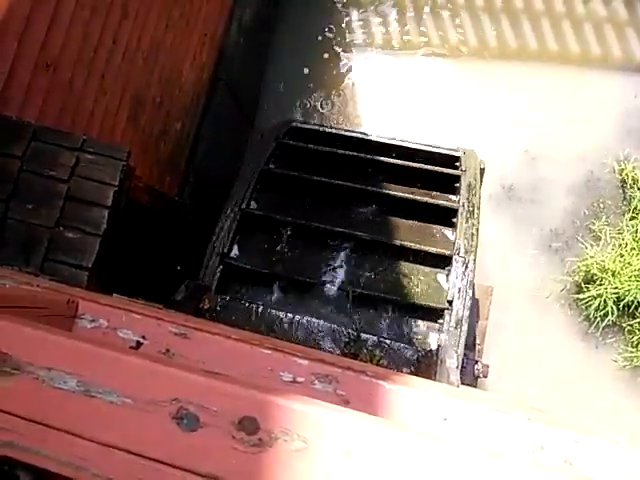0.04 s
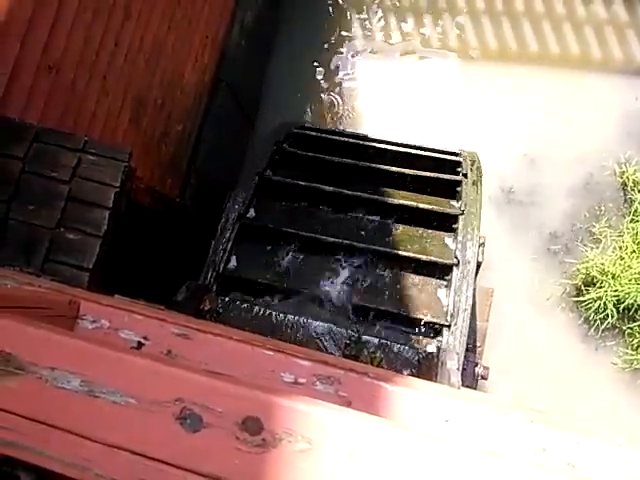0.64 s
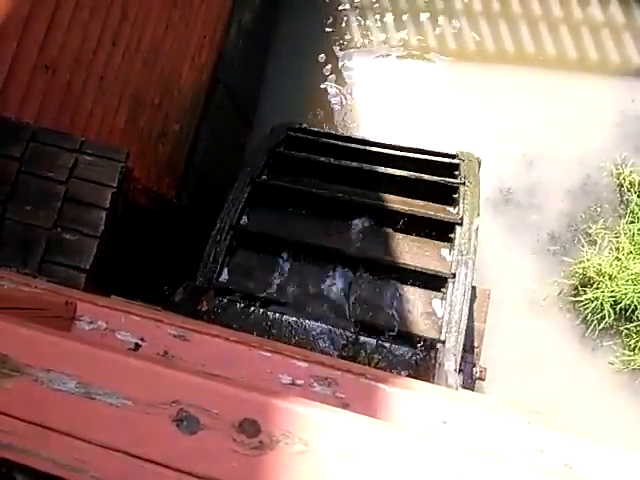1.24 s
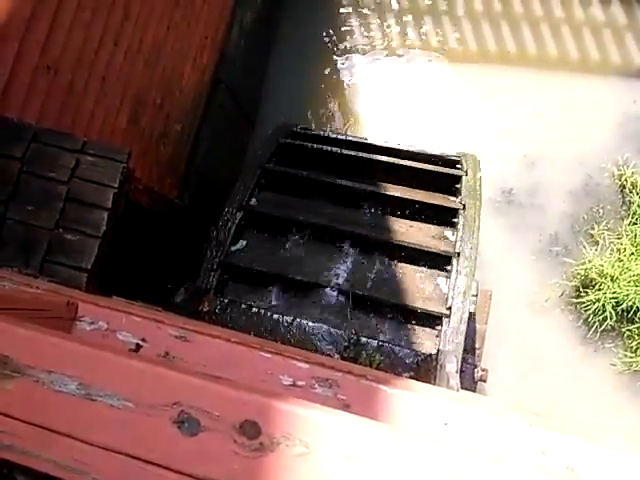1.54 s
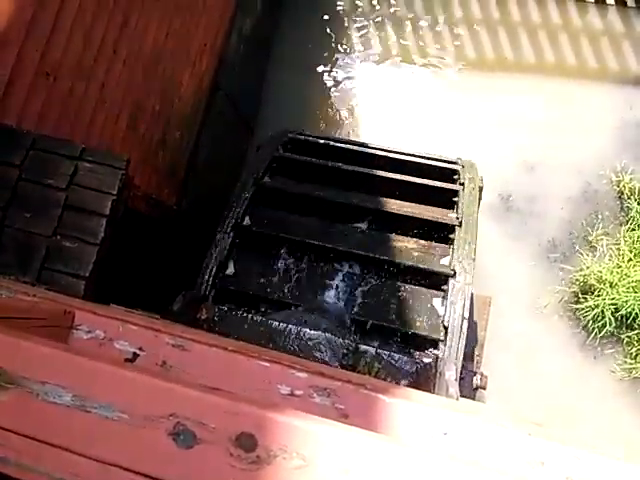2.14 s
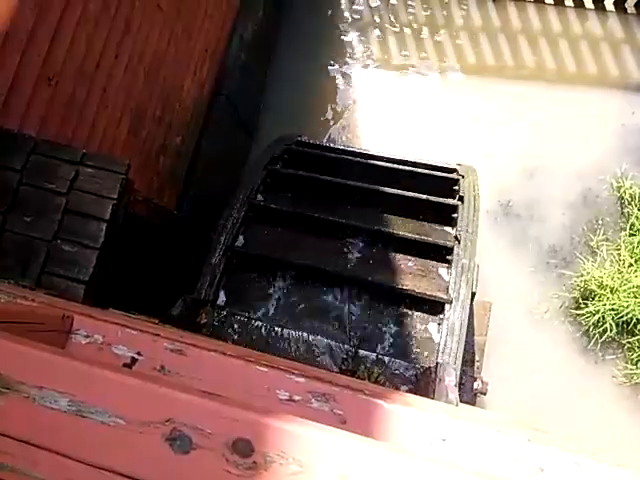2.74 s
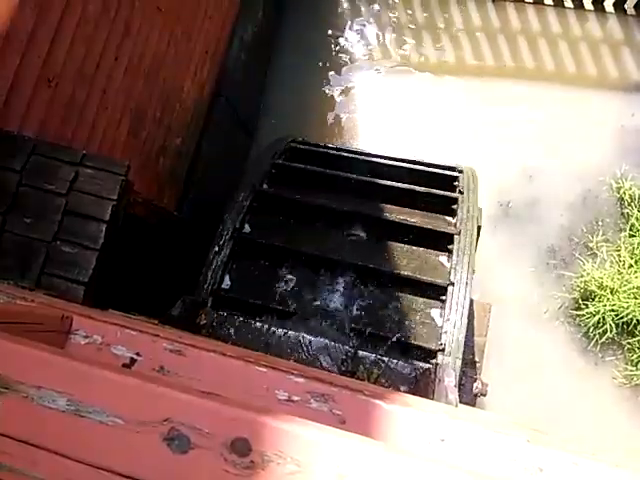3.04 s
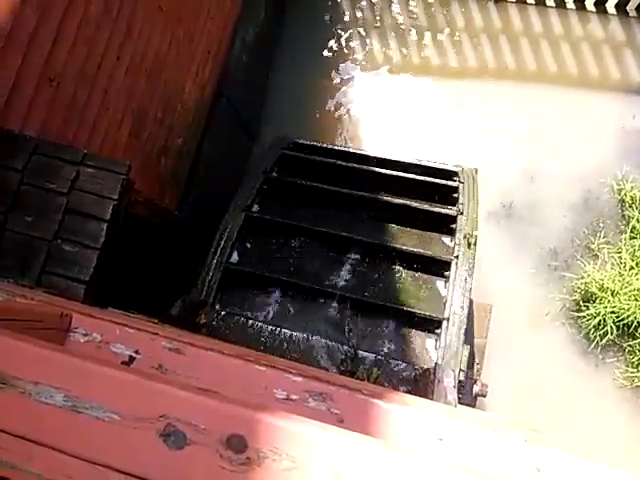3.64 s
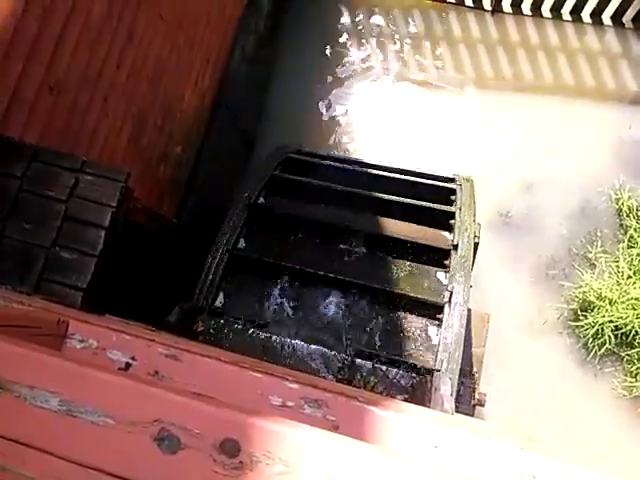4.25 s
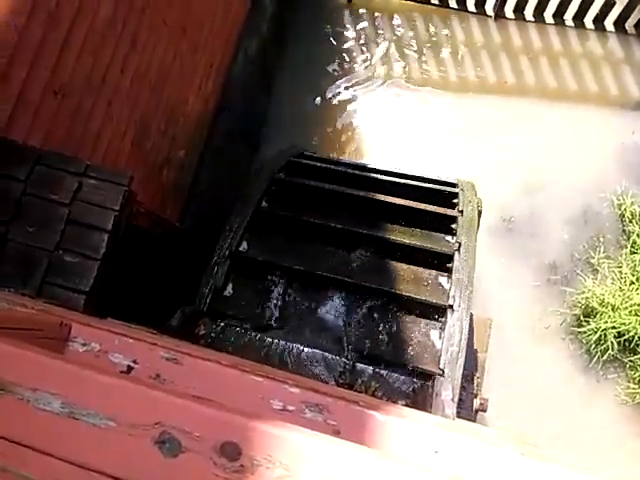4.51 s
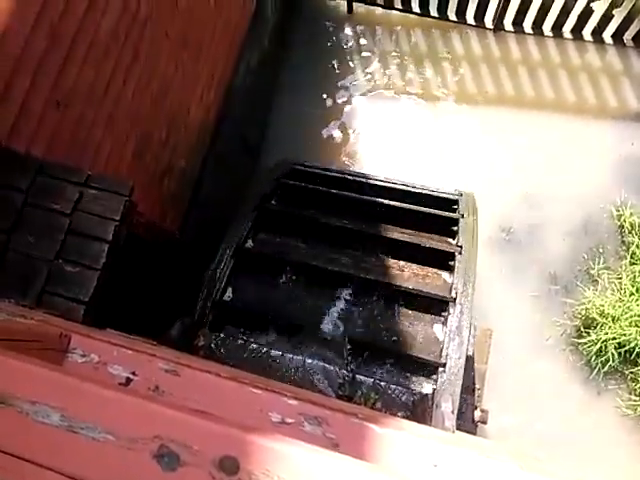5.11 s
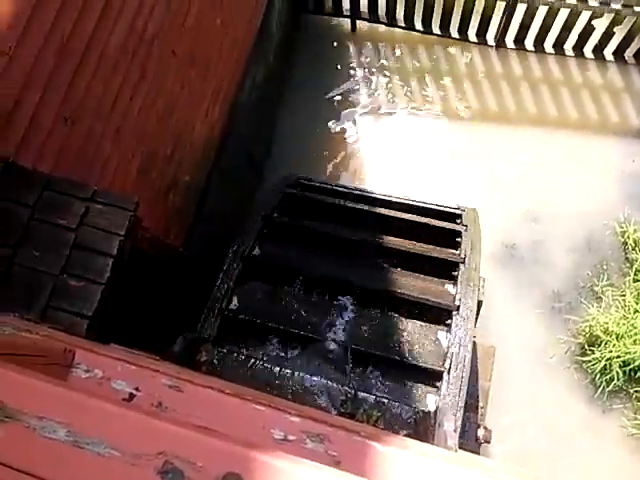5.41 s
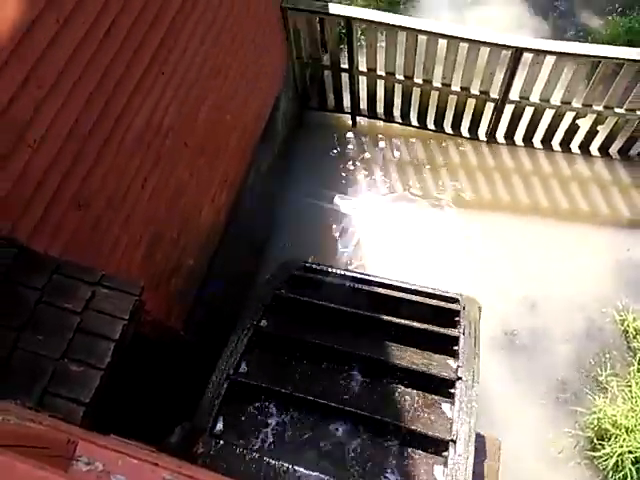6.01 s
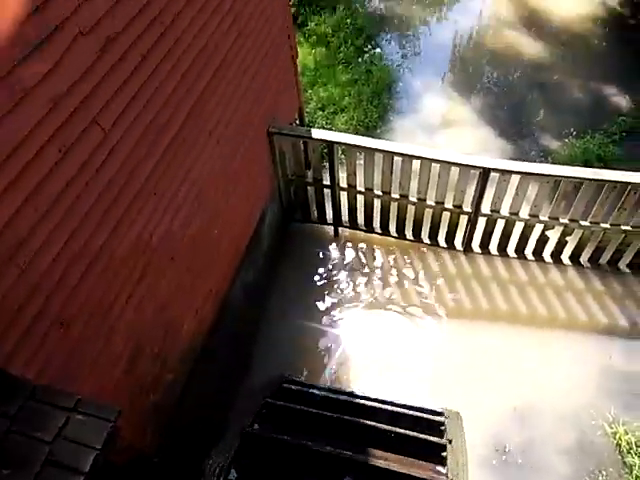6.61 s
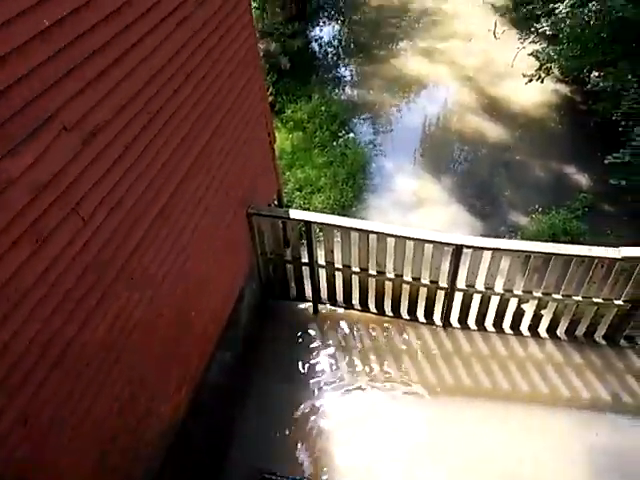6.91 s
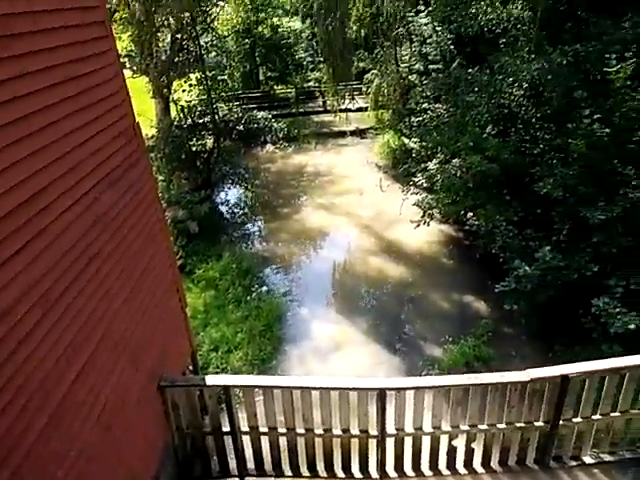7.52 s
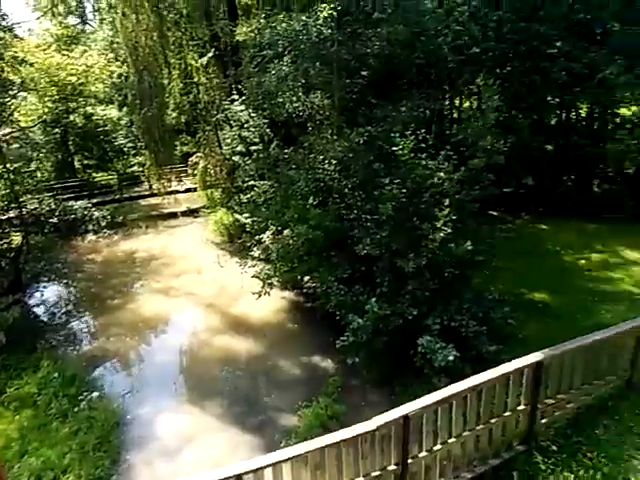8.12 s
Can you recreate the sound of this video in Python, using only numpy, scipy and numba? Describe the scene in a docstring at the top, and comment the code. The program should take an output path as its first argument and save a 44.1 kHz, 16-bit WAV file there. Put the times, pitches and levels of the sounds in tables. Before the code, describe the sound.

Water pours over a wooden mill wheel outdoors for about eight seconds, heard from above on a hand-held microphone. A steady, wide hiss of spray carries fine crackling drops and gurgling bubbles. The paddles tip out short, uneven splashes throughout, clustered around 1 to 1.7, 3 to 3.5 and 4.5 to 5.5 seconds. Single bubbles plop, most clearly near 2.4, 6.3 and 7.3 seconds. Low, dull handling thumps, some with faint finger scrapes, come in the first second, then around 2.2, 3.1, 4.4 and 7 to 7.6 seconds. From about 4 seconds, light gusts buffet the microphone in short low puffs, one side at a time, thickest around 4.3, 5.3 and in the last second. From 5.5 seconds the hiss shifts in tone as the microphone tilts toward the stream, and the water ends slightly fuller and louder.

```python
"""Mill wheel and stream.

Water spills over a wooden mill wheel below a hand-held camera, beside a wall and a stream.
Spray hisses, bubbles gurgle and the paddles slop; the hiss changes colour as the camera tilts up
to the stream. Low thumps and small finger scrapes come through the camera's case, and light gusts
buffet one microphone port at a time."""
import sys
import numpy as np
from scipy import signal
from scipy.fft import rfft, irfft
from scipy.io import wavfile
from scipy.ndimage import uniform_filter1d
from numba import njit

SR = 44100
rng = np.random.default_rng(int(sys.argv[2]) if len(sys.argv) > 2 else 0)


def store_wav(level_fs):
    """Save 16-bit WAV to argv[1]."""
    pcm = np.round(np.clip(np.atleast_2d(level_fs), -1, 1) * 32767)
    wavfile.write(sys.argv[1], SR, pcm.T.astype(np.int16))


N = 364266
TIME = np.arange(N) / SR
FREQ = np.maximum(np.fft.rfftfreq(N, 1 / SR), 1)

# Water colour per camera view, from down at the wheel to facing the stream: f/Hz, relative gain/dB
COLOUR_DOWN = [(30, 2), (100, -4), (380, -6), (650, -7.5), (1020, -7), (1330, -10), (1680, -4.5),
               (2050, -9.5), (2300, -6.5), (2780, -15), (3170, -8.5), (3600, -7.5), (4600, -9), (5350, -11),
               (6300, -5.5), (7100, -3), (8000, -6), (8900, -13), (9600, -10), (11000, -19.5), (14000, -17),
               (15700, -21.5)]
COLOUR_TILTING = [(40, 7), (100, -5.5), (400, -2), (1000, -8), (1700, -6), (2350, -5.5), (3000, -7.5),
                  (4000, -3), (5200, -3.5), (7200, 0.5), (8800, -2.5), (11000, -14), (14000, -12.5),
                  (15700, -12)]
COLOUR_LEVEL = [(40, -12), (100, 11), (400, -4), (1000, -6), (1600, -2), (2400, 0), (3500, -2.5),
                (4400, -6.5), (5500, 3.5), (7100, 6.5), (8700, 1.5), (11000, -8), (14000, -7.5),
                (15700, -13)]
COLOUR_STREAM = [(40, -20), (100, 12), (400, 2), (1000, -1.5), (1800, 6), (2800, 0), (3500, -1),
                 (4700, -10), (6800, 1), (8800, 0.5), (10500, -12.5), (14000, -9), (15700, -18)]
# Arrival at each view: t/s
VIEW_TIMES_S = [5.5, 6.3, 7.25, 7.95]
# Port balance: f/Hz, left minus right/dB
BALANCE_WHEEL = [(400, -1.2), (950, 0), (1250, -1), (1900, 2.5), (2400, -0.5), (3200, 1.3), (4200, 0.5),
                 (5000, 6.5), (5800, -2.5), (6800, -3), (8500, .3), (12500, 0.5), (14000, 3), (15500, 3)]
BALANCE_STREAM = [(400, 0.5), (1000, 1), (1400, 1.5), (1900, 1.5), (2400, -0.5), (3500, -4), (5500, -0.5),
                  (7000, -0.7), (10000, 0), (15000, -4)]
# Steady fall of water: t/s, spray level/dB, pool level/dB
WATER_FLOW = [(0.0, -42.5, -49.5), (0.85, -42.5, -52.5), (1.66, -40.5, -51), (2.42, -42, -53),
              (3.13, -41.5, -50), (3.47, -43, -51), (4.23, -41.5, -52), (5.89, -42, -52),
              (7.66, -42.5, -47), (8.26, -38.5, -47.5)]


def wheel(pool_db=-2.5, surge_db=-6.0, mist_db=-2.0, mist_follow=0.75, slosh_hz=9):
    """Falling water: low pool, mid splatter, high mist, its hiss changing colour as the camera tilts."""
    ports = at_ports(churn())
    ports = ports / (1 + (62 / FREQ) ** 3)  # small bubbles make no deep bass
    pool_band = 1 / (1 + (FREQ / 2900) ** 12)
    below_mist = 1 / (1 + (FREQ / 5600) ** 8)
    slosh = walk(slosh_hz)  # uneven flow over the paddles stirs both pool and spray
    pool_gain = undb(curve(WATER_FLOW, column=2) + pool_db + 0.8 * slosh)
    sheet_gain = undb(curve(WATER_FLOW, column=1) - 0.1 * slosh)
    splatter_gain = np.hypot(sheet_gain, undb(surge_db) * thrown_spray())
    softened_surges = splatter_gain ** mist_follow * splatter_gain.mean() ** (1 - mist_follow)
    mist_gain = undb(mist_db + 0.3 * walk(16)) * softened_surges
    views = [(COLOUR_DOWN, BALANCE_WHEEL), (COLOUR_TILTING, BALANCE_WHEEL),
             (COLOUR_LEVEL, BALANCE_STREAM), (COLOUR_STREAM, BALANCE_STREAM)]
    out = 0
    for (colour, balance), share in zip(views, np.eye(4)):
        spectrum = ports * undb(along(colour, FREQ)) * pan(along(balance, FREQ))
        deep = spectrum / band_rms(spectrum, 1500, 2700)
        bright = spectrum / band_rms(spectrum, 3000, 10000)
        pool = irfft(deep * pool_band, N) * pool_gain
        splatter = irfft(bright * (1 - pool_band) * below_mist, N) * splatter_gain
        mist = irfft(bright * (1 - below_mist), N) * mist_gain
        crossfade = np.interp(TIME, VIEW_TIMES_S, share)
        out = out + crossfade * (pool + splatter + mist)
    return out


# Likeness of the water at the two ports: f/Hz, coherence
PORT_COHERENCE = [(100, 0.91), (420, .8), (750, 0.74), (1000, 0.28), (1450, 0.14), (1700, 0.37),
                  (2000, 0.18), (2400, 0.48), (2900, 0.24), (3500, 0.37), (5500, 0.078), (8000, .02)]
# Phase between the ports: f/Hz, left lead/rad
PORT_LEAD = [(200, 0.16), (600, 0.75), (1050, 1.27), (1300, 2), (1700, 0.67), (2500, .02)]


def at_ports(water):
    """Spectra of the water at the two ports: alike in the bass, nearly unrelated in the treble."""
    common, difference = rfft(water)
    coherence = along(PORT_COHERENCE, FREQ)
    mid = common * np.sqrt(1 + coherence)
    side = difference * np.sqrt(1 - coherence)
    return np.array([(mid + side) * np.exp(1j * along(PORT_LEAD, FREQ)), mid - side])


def churn():
    """Uncoloured water: spray, crackling and ringing drops, spatter on wet boards, bubbles, gulps."""
    hiss = undb(2.5) * spray()
    crackle = undb(-5) * shower(2950, 13500, cycles=4.4, spread_db=-0.5, rise=0.026, count=22000)
    tinkles = undb(-11) * shower(3000, 8500, cycles=390, spread_db=-1, rise=0.0545, count=1500)
    patter = undb(-11) * shower(2943, 9180, cycles=49, spread_db=-0.5, rise=0.024, count=700)
    spatter = undb(-10) * shower(4400, 14000, cycles=1.7, spread_db=1.5, rise=0.02, count=1500)
    bubbles = undb(-10) * shower(990.4, 4225, cycles=48, spread_db=3, rise=0.048, count=2600)
    gulps = undb(-19) * shower(245, 700, cycles=13.6, spread_db=4, rise=0.097, count=420)
    return hiss + crackle + tinkles + patter + spatter + bubbles + gulps


def spray(flicker_db=3.0, flicker_hz=26):
    """Sheets of spray, a noise band each, swell and thin on their own; the finest are steadiest."""
    noise = rfft(rng.standard_normal((2, N)))
    centres_hz = [500, 1200, 1800, 2500, 3300, 4200, 5300, 6600, 8200, 13000]
    hiss = 0
    for hz, share in zip(centres_hz, np.eye(len(centres_hz))):
        sheet = irfft(noise * np.interp(FREQ, centres_hz, share), N)
        unrest = np.clip(4800 / hz, 0.55, 1)
        hiss = hiss + sheet * undb(unrest * flicker_db * walk(flicker_hz))
    return hiss


def shower(lo_hz, hi_hz, cycles, spread_db, rise, count):
    """Bubbles of uneven size spread evenly over a band; two unrelated channels, rms 1."""
    when, pitch, size, life, left_turns, right_turns = rng.random((count, 6)).T
    hz = lo_hz + (hi_hz - lo_hz) * pitch
    amplitude = undb(-spread_db * np.log(1 - 0.99 * size)) * np.sqrt(hz)
    left, right = np.exp(2j * np.pi * left_turns), np.exp(2j * np.pi * right_turns)
    return unit(ring(when * N / SR, hz, cycles * (0.5 + life), amplitude, left, right, rise))


@njit
def ring(start_s, hz, cycles, amplitude, left, right, rise):
    """Damped sines, rising as the bubbles near the surface; left and right are complex port gains."""
    out = np.zeros((2, N))
    for k in range(len(start_s)):
        decay_samples = cycles[k] * SR / hz[k] / 3
        omega = 2 * np.pi * hz[k] / SR
        phasor = amplitude[k] + 0j
        step = np.exp(1j * omega - 1 / decay_samples)
        glide = np.exp(1j * omega * rise / (5 * decay_samples))
        for i in range(int(start_s[k] * SR), min(N, int(start_s[k] * SR + 5 * decay_samples))):
            out[0, i] += (phasor * left[k]).imag
            out[1, i] += (phasor * right[k]).imag
            phasor *= step
            step *= glide
    return out


# Paddles tipping out water: t/s, length/s, gush level/dB, gush f/Hz, spray level/dB
PADDLE_SPLASHES = [(0.625, 0.025, -59, 2000, -53), (0.861, 0.13, -51.5, 1880, -36),
                   (1.046, 0.047, -49, 1710, -35.5), (1.111, 0.073, -58, 3530, -40),
                   (1.287, 0.058, -67, 1900, -35.5), (1.332, 0.06, -48.5, 1870, -49),
                   (1.479, 0.06, -49, 3380, -44), (1.675, 0.14, -51.5, 1760, -40),
                   (2.344, 0.082, -47.5, 2020, -40), (2.817, 0.063, -58, 1810, -43),
                   (2.888, 0.035, -56, 3500, -34.5), (2.964, 0.051, -53, 3500, -37.5),
                   (3.198, 0.037, -50, 2100, -44), (3.25, 0.15, -54, 3450, -42),
                   (3.417, 0.015, -45, 1680, -50), (3.455, 0.026, -49, 2000, -56),
                   (3.866, 0.28, -57, 1740, -39.5), (4.36, 0.048, -67, 1800, -35.5),
                   (4.558, 0.057, -48, 3300, -41), (4.798, 0.053, -51, 1800, -37),
                   (4.875, 0.027, -55, 1800, -37.5), (5.066, 0.08, -55, 3530, -38),
                   (5.129, 0.066, -52, 1850, -42), (5.359, 0.047, -67, 1800, -37),
                   (5.438, 0.02, -44, 1630, -46), (6.145, 0.07, -50.5, 2400, -43),
                   (6.384, 0.14, -49.5, 2300, -41.5), (6.869, 0.026, -53, 2200, -34),
                   (7.075, 0.028, -67, 2100, -32.5), (7.317, 0.042, -45.5, 2200, -38),
                   (7.645, 0.012, -34, 2100, -51), (7.67, 0.024, -41, 1900, -55),
                   (7.737, 0.016, -46, 1900, -55), (7.796, 0.035, -42.5, 2850, -47),
                   (7.989, 0.06, -45, 3140, -37.5), (8.058, 0.04, -38, 2670, -42)]


def splashes(q=2.26, width=0.6):
    """A paddle empties: a short rush of small bubbles around one pitch."""
    out = np.zeros((2, N))
    for start_s, length_s, db, hz, _ in PADDLE_SPLASHES:
        gush = lambda f: resonance(f, hz, q) ** 2
        mid, side = (burst(length_s, gush, attack_s=0.002, decay_s=0.01, tail_db=-27, tail_s=0.056)
                     for _ in range(2))
        add(out, undb(db) * stereo(mid, side, width), start_s)
    return out


def thrown_spray(rise_s=0.0077, fall_s=0.0075):
    """Gain of the spray the paddles throw: it rises, lasts as long as the gush and falls back."""
    power = 0
    for start_s, length_s, _, _, db in PADDLE_SPLASHES:
        rise = np.clip((TIME - start_s) / rise_s + 0.5, 0, 1)
        fall = np.exp(-np.maximum(TIME - start_s - length_s, 0) / fall_s)
        power = power + (undb(db) * rise * fall) ** 2
    return np.sqrt(power)


# Single large bubbles: t/s, level/dB, f/Hz
LARGE_BUBBLES = [(0.385, -40, 1770), (0.879, -38, 1720), (1.052, -35.5, 1030), (1.373, -33.5, 1860),
                 (1.945, -36, 1950), (2.3644, -25, 1610), (2.389, -23.5, 1680), (2.485, -40, 1640),
                 (2.514, -31.5, 1630), (2.568, -36, 1720), (3.238, -36, 1660), (4.965, -46, 380),
                 (5.095, -42, 245), (5.165, -36, 1700), (5.435, -41, 496), (5.99, -45, 368),
                 (6.11, -42, 440), (6.25, -45.5, 365), (6.3, -47, 483), (6.308, -28.5, 2360),
                 (6.53, -34, 2350), (6.66, -29, 2420), (7.224, -29, 1560), (7.335, -25, 1460),
                 (7.609, -33, 1280), (7.681, -39, 1920), (8.25, -28, 1760)]


def plops(gain_db=3.0, lead_rad=0.59, scatter_rad=1.2, shed_s=0.028, shed_db=-12, shed_octaves=0.18):
    """A large pocket of trapped air rings once and sheds five weaker bubbles near its pitch."""
    out = np.zeros((2, N))
    for start_s, db, hz in LARGE_BUBBLES:
        gain = undb(db + gain_db)
        add(out, gain * bubble(hz, lead_rad), start_s)
        for late, detune, place in rng.uniform(-1, 1, (5, 3)):
            shed = bubble(hz * 2 ** (shed_octaves * detune), lead_rad + scatter_rad * place)
            add(out, gain * undb(shed_db) * shed, start_s + shed_s * (1 + late) / 2)
    return out


def bubble(hz, lead_rad, rise=0.019, q=19.2, swell_cycles=4.6, size=4096):
    """One bubble swells, rings and fades as its pitch climbs; the left port leads by lead_rad."""
    cycles = hz * np.arange(size) / SR
    envelope = swell(cycles / swell_cycles) * np.exp(-np.pi * cycles / q)
    phase = 2 * np.pi * cycles * (1 + rise * cycles / (2 * q))
    return envelope * np.sin(phase + np.array([[lead_rad], [0]]))


# Bumps on the case: t/s, length/s, level/dB, nominal f/Hz
CASE_THUMPS = [(0, 0.071, -30.5, 74.5), (0.018, 0.048, -28.5, 147), (0.307, 0.038, -35, 140),
               (0.384, 0.34, -44, 132), (0.572, 0.045, -34.5, 149), (0.632, 0.06, -30.5, 157),
               (0.65, 0.063, -32, 75), (0.695, 0.045, -35, 122), (0.75, 0.074, -41, 90.5),
               (1.865, 0.083, -47.5, 180), (1.994, 0.062, -28.5, 117), (2.041, 0.039, -29.5, 129),
               (2.099, 0.08, -41, 122), (2.165, 0.077, -32.5, 89), (2.257, 0.032, -21.5, 130),
               (2.297, 0.0307, -34.5, 152), (3.106, 0.017, -38, 150), (3.125, 0.03, -30, 133),
               (3.163, 0.013, -27, 133), (3.2, 0.013, -37, 99), (3.56, 0.0188, -34, 104),
               (4.386, 0.012, -27, 149), (4.398, 0.022, -19, 122), (4.435, 0.026, -24, 110),
               (4.483, 0.041, -30.5, 79.6), (7.04, 0.036, -32.5, 153), (7.073, 0.029, -28, 149),
               (7.344, 0.029, -31.5, 155), (7.5, 0.02, -35, 138), (7.625, 0.0094, -31.5, 180),
               (7.642, 0.061, -29.5, 194)]


def thumps(width=0.13, settle_s=0.24, settle_db=-23, settle_ratio=0.85):
    """Bumps shake the whole case, nearly alike at both ports; the grip settles with a lower rumble."""
    def boom(hz):
        return lambda f: (low_pass(f, 1.07 * hz, q=3.1) * low_pass(f, 235, q=1.86)
                          * high_pass(f, 52, q=1.78))

    out = np.zeros((2, N))
    for start_s, length_s, db, hz in CASE_THUMPS:
        mid, side = (knocks(length_s, boom(hz), gap_s=0.008, fade_db=1.5) for _ in range(2))
        add(out, undb(db) * stereo(mid, side, width), start_s)
        settle = knocks(settle_s, boom(settle_ratio * hz), gap_s=0.0054, fade_db=35, first_db=-2)
        add(out, undb(db + settle_db) * np.array([settle, settle]), start_s + length_s)
    return out


# Modes of the hollow inside the case: f/Hz, Q, gain/dB
CAVITY_MODES = [(287, 10.5, -1.5), (368, 18.5, 6.5), (459, 17, -4.5), (596, 58, -8), (775, 19, -31)]
# Fingers on the case: t/s, length/s, shell level/dB, shell f/Hz, cavity level/dB
FINGER_SCRAPES = [(0.005, 0.077, -43.5, 1460, -43), (0.298, 0.087, -50.5, 1500, -53.5),
                  (0.579, 0.2, -53.5, 1540, -45.5), (1.988, 0.082, -45, 1480, -55),
                  (3.104, 0.023, -48, 1350, -45), (3.124, 0.009, -31, 1300, -39),
                  (3.135, 0.048, -39, 1330, -42.5), (3.524, 0.059, -46, 1360, -46),
                  (3.53, 0.0065, -39, 1340, -52), (4.373, 0.068, -47.5, 1470, -56),
                  (7.027, 0.04, -47.5, 1500, -38.5), (7.071, 0.043, -49, 1590, -38),
                  (7.333, 0.047, -61, 1500, -42), (7.473, 0.2, -76, 1500, -48.5)]


def scrapes(shell_q=8, upper_ratio=1.25, upper_db=-9, rasp_db=-14, pan_db=3.0, width=0.87):
    """Skin sticks and slips on the case, ringing two shell modes and, lower down, the cavity."""
    def cavity(f):
        modes = sum(undb(db) * resonance(f, hz, q) for hz, q, db in CAVITY_MODES)
        return modes * low_pass(f, 620, q=0.74)

    out = np.zeros((2, N))
    for start_s, length_s, shell_db, shell_hz, cavity_db in FINGER_SCRAPES:
        def shell(f):
            lower = resonance(f, shell_hz, shell_q)
            upper = undb(upper_db) * resonance(f, upper_ratio * shell_hz, shell_q)
            rasp = undb(rasp_db) * resonance(f, 1000, q=1.1)
            return (lower + upper + rasp) * low_pass(f, 2170, q=0.38)

        mid, side = (knocks(length_s, shell, gap_s=0.0028, fade_db=4, count=80) for _ in range(2))
        rub = stereo(mid, side, width)
        hollow = burst(length_s, cavity, attack_s=0.012, decay_s=0.0041, tail_db=-35, tail_s=0.069)
        add(out, pan(pan_db) * (undb(shell_db) * rub + undb(cavity_db) * hollow), start_s)
    return out


# Puffs of air: t/s, length/s, level/dB, eddy f/Hz, port (0 left, 1 right)
PORT_GUSTS = [(4.058, 0.046, -27, 68, 0), (4.287, 0.03, -34.5, 75, 1), (4.319, 0.025, -20.5, 87, 1),
              (4.369, 0.04, -28, 95, 1), (4.403, 0.083, -24, 89, 1), (4.538, 0.11, -44, 70, 0),
              (4.746, 0.017, -39.5, 100, 0), (5.176, 0.041, -37, 75, 0), (5.244, 0.037, -27.5, 81.4, 0),
              (5.301, 0.025, -21, 92, 0), (5.345, 0.024, -21, 68.4, 0), (5.395, 0.055, -28, 91, 0),
              (5.444, 0.06, -28, 89, 0), (5.521, 0.044, -27.5, 96, 0), (5.584, 0.026, -27.5, 81, 0),
              (5.632, 0.042, -36.5, 75, 0), (5.693, 0.0126, -22, 118, 0), (5.888, 0.054, -30, 66, 0),
              (6.547, 0.1, -28.5, 68.6, 1), (6.686, 0.025, -30.5, 70, 1), (6.906, 0.039, -34, 67, 0),
              (7.179, 0.051, -30.5, 62.4, 0), (7.4, 0.019, -24, 102, 0), (7.454, 0.028, -30, 103, 0),
              (7.714, 0.046, -27.5, 91, 1), (7.8, 0.051, -28.5, 55, 0), (7.823, 0.051, -29, 70.6, 1),
              (7.875, 0.011, -23, 119, 0), (7.893, 0.032, -34, 60, 1), (7.962, 0.033, -25.5, 124, 0),
              (8.029, 0.02, -27.5, 59, 0), (8.066, 0.041, -29.5, 60, 1), (8.12, 0.053, -28.5, 64, 0),
              (8.202, 0.052, -29.5, 62, 0)]


def gusts(leak_db=-30, wake_s=0.29, wake_db=-21.5):
    """Each puff tumbles over one port and barely reaches the other; a weak wake follows."""
    out = np.zeros((2, N))
    for start_s, length_s, db, hz, port in PORT_GUSTS:
        def eddy(f):
            roll_off = low_pass(f, 2.5 * hz, q=0.25) * low_pass(f, 2.42 * hz, q=1.0)
            return resonance(f, hz, q=1.3) * roll_off

        far_port = np.array([[0], [1]]) != port
        gain = undb(db + leak_db * far_port)
        puff = knocks(length_s, eddy, gap_s=0.009, fade_db=5.5, first_db=-4.5)
        wake = knocks(wake_s, eddy, gap_s=0.011, fade_db=27, first_db=3.5)
        add(out, gain * puff, start_s)
        add(out, gain * undb(wake_db) * wake, start_s + length_s)
    return out


def burst(length_s, response, attack_s, decay_s, tail_db, tail_s, size=16384):
    """Noise that swells, holds and dies away, heard through a response."""
    t = np.arange(size) / SR
    release_s = np.maximum(t - 0.5 * length_s, 0)
    decay = np.exp(-release_s / (decay_s + 0.35 * length_s))
    tail = undb(tail_db) * np.exp(-release_s / tail_s)
    force = rng.standard_normal(size) * swell(t / attack_s) * (decay + tail)
    return excite(response, force, length_s)


def knocks(length_s, response, gap_s, fade_db, first_db=0, size=16384, count=40):
    """An uneven, fading run of pushes that stops soon after length_s, heard through a response."""
    spacing, sign, strength = rng.random((count, 3)).T
    gaps_s = gap_s * (0.3 + 2 * spacing ** 2)
    t = np.cumsum(gaps_s) - gaps_s[0]
    pushes = np.sign(sign - 0.5) * np.where(t > 0, 0.4 + strength, undb(first_db))
    fade = undb(-fade_db * t / length_s) / (1 + (t / length_s) ** 8)
    onsets = np.minimum(t * SR, size).astype(int)
    force = np.bincount(onsets, pushes * fade, size + 1)[:size]
    return excite(response, force, length_s)


def excite(response, force, length_s):
    """Filter a force; the result has the energy of rms 1 held for length_s."""
    f = np.maximum(np.fft.rfftfreq(len(force), 1 / SR), 1)
    return unit(irfft(rfft(force) * response(f))) * np.sqrt(length_s * SR / len(force))


def resonance(f, hz, q):
    """Complex response of one damped mode, 1 at its centre."""
    return 1 / (1 + 1j * q * (f / hz - hz / f))


def low_pass(f, hz, q):
    """Mass on a spring: flat below hz, gain q at hz, falling above."""
    return 1 / (1 - (f / hz) ** 2 + 1j * f / (hz * q))


def high_pass(f, hz, q):
    """Mirror of low_pass: flat above hz."""
    return (f / hz) ** 2 * low_pass(f, hz, q)


def walk(rate_hz):
    """Random steps, smoothed twice; spread near 1."""
    hold = int(SR / rate_hz)
    steps = rng.standard_normal(1024)[np.arange(N) // hold % 1024]
    return 1.14 * uniform_filter1d(uniform_filter1d(steps, hold), hold)


def swell(progress):
    """Smooth rise from 0 to 1, then hold."""
    return np.sin(np.pi / 2 * np.minimum(progress, 1)) ** 2


def along(points, hz):
    """Read an (f/Hz, value) table on a log-frequency axis."""
    f, value = np.transpose(points)
    return np.interp(np.log(hz), np.log(f), value)


def curve(rows, column):
    """Interpolate one column of a (t/s, ...) table."""
    rows = np.array(rows, float)
    return np.interp(TIME, rows[:, 0], rows[:, column])


def band_rms(spectrum, lo_hz, hi_hz):
    """Rms of a stereo spectrum's mid signal within a band."""
    band = spectrum.mean(0)[(FREQ > lo_hz) & (FREQ < hi_hz)]
    return np.sqrt(2 * np.sum(np.abs(band) ** 2)) / N


def undb(db):
    """Decibels to gain."""
    return 10 ** (np.asarray(db) / 20)


def unit(x):
    """Scale to rms 1."""
    return x / np.sqrt(np.mean(x ** 2) + 1e-18)


def pan(db):
    """Port gains, left above right by db."""
    return undb(np.array([[0.5], [-0.5]]) * db)


def stereo(mid, side, width):
    """Mid and side to left and right."""
    return np.array([mid + width * side, mid - width * side])


def add(out, sound, start_s):
    """Mix a stereo sound into out."""
    i = int(np.clip(start_s * SR, 0, N - 1))
    out[:, i:i + sound.shape[1]] += sound[:, :N - i]


def scene():
    """The wheel with its splashes and bubbles; handling and wind at the camera."""
    return wheel() + splashes() + plops() + thumps() + scrapes() + gusts()


def record(dry, bottom_hz=41, top_hz=15750):
    """The camera cuts the deepest rumble and the top."""
    low_cut = signal.butter(4, bottom_hz, "high", fs=SR, output="sos")
    high_cut = signal.ellip(10, 0.2, 80, top_hz, fs=SR, output="sos")
    return signal.sosfilt(high_cut, signal.sosfilt(low_cut, dry))


dry = scene()
out = record(dry)
store_wav(out)
```